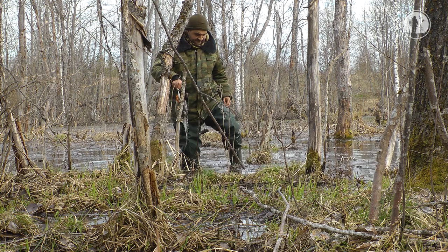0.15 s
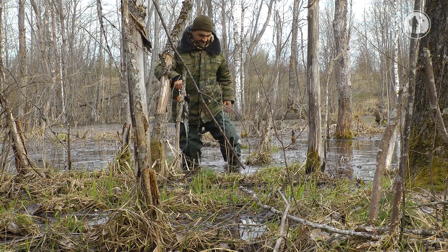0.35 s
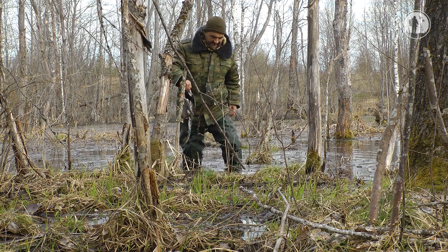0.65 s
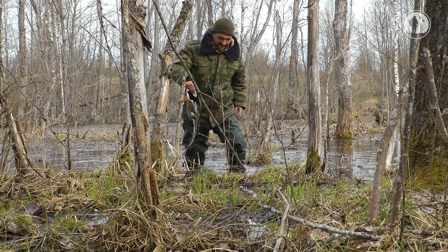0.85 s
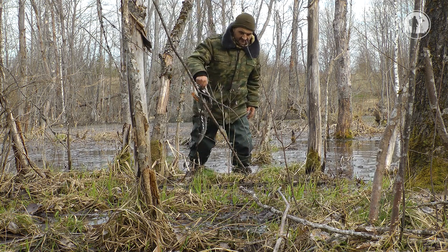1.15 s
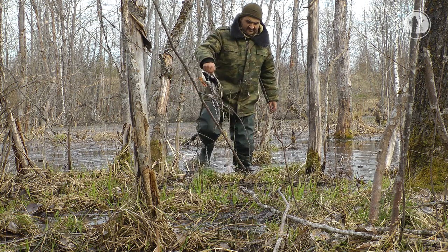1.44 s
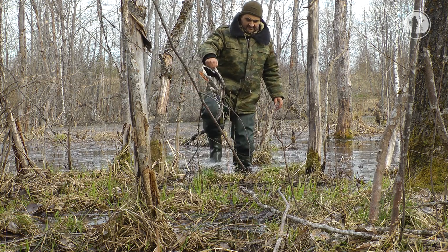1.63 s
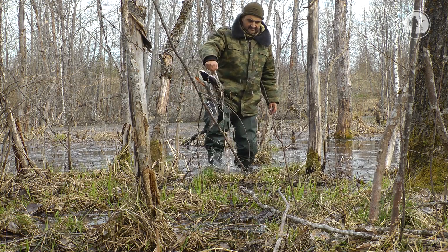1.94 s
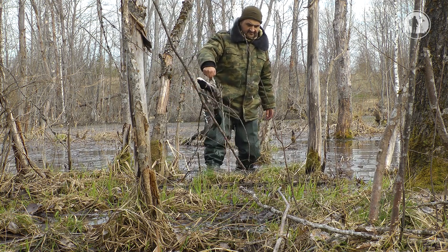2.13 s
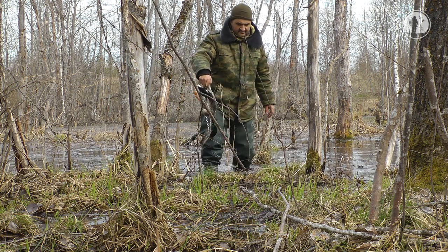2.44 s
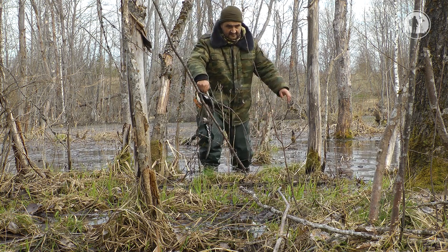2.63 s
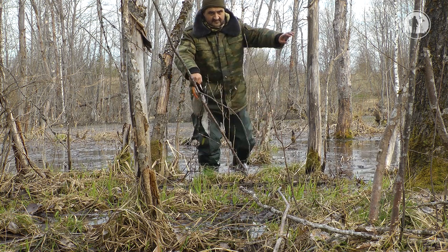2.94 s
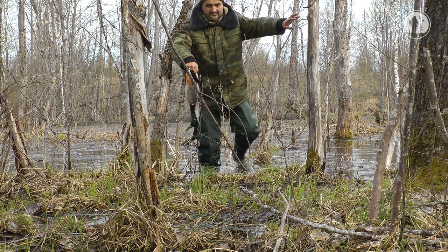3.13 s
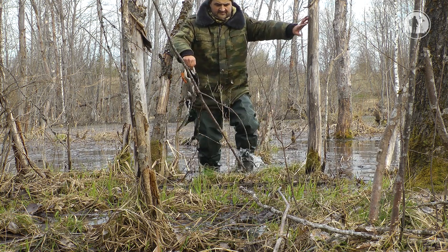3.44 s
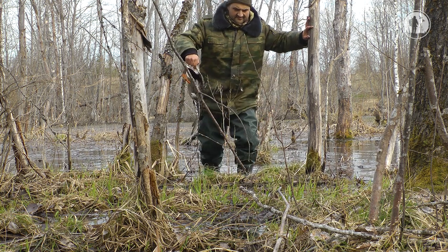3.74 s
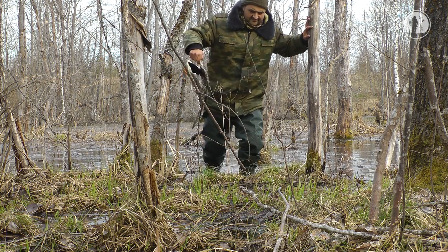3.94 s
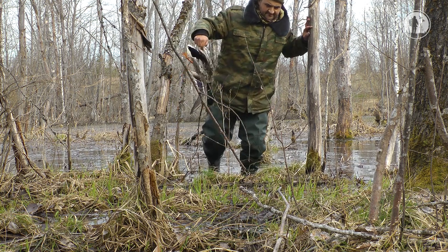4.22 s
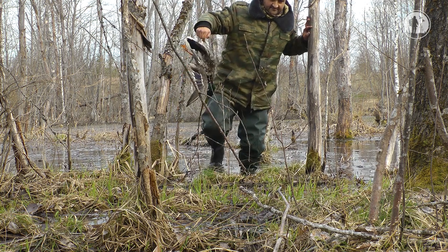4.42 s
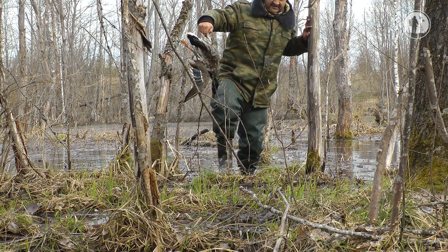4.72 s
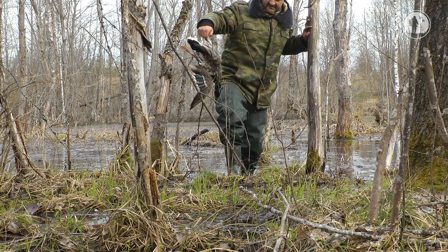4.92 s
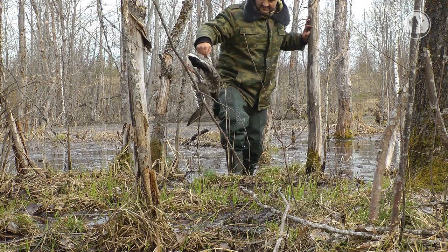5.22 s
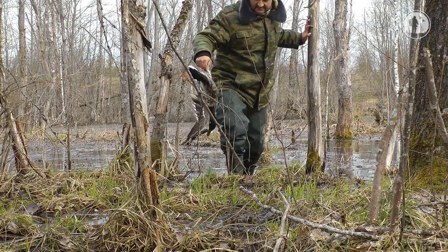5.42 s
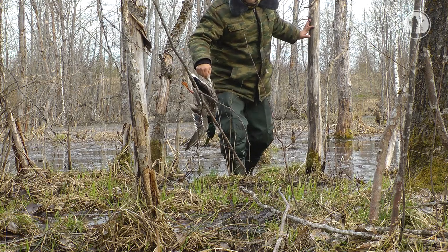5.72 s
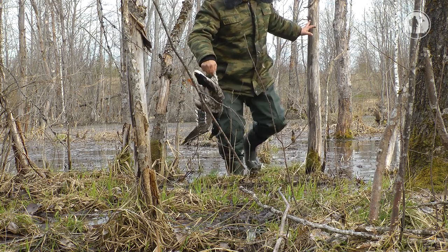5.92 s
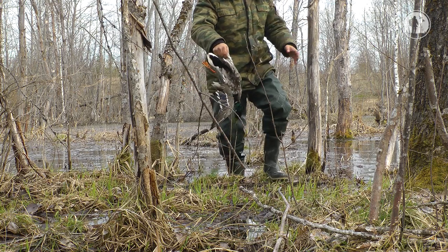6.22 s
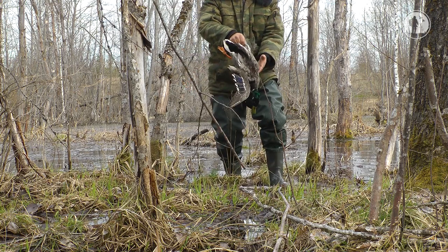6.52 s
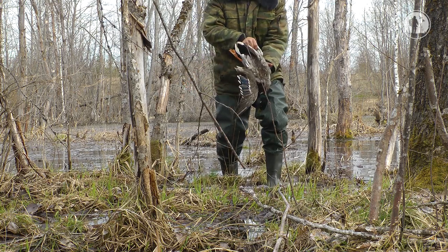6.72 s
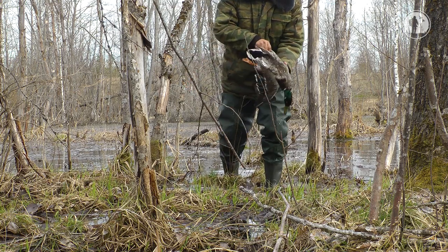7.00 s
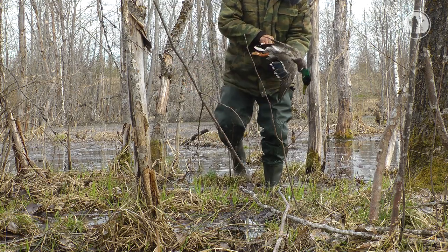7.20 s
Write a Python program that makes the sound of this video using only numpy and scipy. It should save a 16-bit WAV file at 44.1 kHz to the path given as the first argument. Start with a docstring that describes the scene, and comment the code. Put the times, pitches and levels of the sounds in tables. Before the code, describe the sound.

Rubber boots wade through shallow floodwater with splashes, gulps and slaps about every second and a half, while birds whistle over a hushed wood.

```python
"""A man in rubber boots wades through shallow floodwater in a spring wood, under a steady hush of air.
His first strides splash with bubbles and spray; far birds whistle and twigs snap. Then gulps begin, a near bird
sings, gusts touch the microphone, a boot thuds in the water, and the heaviest slaps follow. Near the end he treads
on wet sod with more thuds and snaps, and still splashes. Water sounds are swarms and single rising bubble tones,
resonant bursts and shaped spray; birds are gliding sines, air and wind coloured noise, thuds sums of fading tones."""
import sys
import numpy as np
from scipy import signal
from scipy.fft import rfft, irfft, next_fast_len
from scipy.io import wavfile
from scipy.ndimage import uniform_filter1d, map_coordinates

SR = 44100
rng = np.random.default_rng(int(sys.argv[2]) if len(sys.argv) > 2 else 0)


def master_out(mix):
    """Clip the mix to full scale and print it as 16-bit PCM to the path in sys.argv[1]."""
    frames = np.transpose(np.atleast_2d(mix))
    ceiling = np.clip(frames, -1, 1)
    pcm = np.round(ceiling * 32767).astype(np.int16)
    wavfile.write(sys.argv[1], SR, pcm)


N = 324481  # length in samples
CONTROL_S = .001  # time step of the level curves, seconds
# All levels in the tables are relative: some functions add a trim in dB.


def amp(db):
    """Turn decibels into gain."""
    return 10 ** (np.asarray(db) / 20)


def unit(x):
    """Scale to an rms of 1."""
    return x / np.sqrt(np.mean(x ** 2) + 1e-20)


def along(points, hz):
    """Read a curve of (Hz, value) points on a log frequency axis."""
    point_hz, value = np.transpose(points)
    return np.interp(np.log(hz + 1), np.log(point_hz + 1), value)


def clock(length):
    """Sample times over a length in seconds."""
    return np.arange(max(int(length * SR), 2)) / SR


def add(track, s, x):
    """Mix x into the track at s seconds."""
    part = track[max(round(s * SR), 0):][:len(x)]
    part += x[:len(part)]


def wobble(rate):
    """A smooth random curve with `rate` random points a second."""
    points = rng.standard_normal(int(N * rate / SR) + 4)
    return map_coordinates(points, [np.arange(N) * rate / SR])


def filtered(x, response):
    """Multiply the spectrum of x by a response of frequency."""
    size = next_fast_len(N + SR // 2)
    spectrum = rfft(x, size) * response(np.fft.rfftfreq(size, 1 / SR))
    return irfft(spectrum, size)[..., :N]


def coloured(x, spectrum, size=4096):
    """Colour x by (Hz, dB) points with a filter that never acts ahead of time; the result has rms 1."""
    cepstrum = irfft(np.log(amp(along(spectrum, np.fft.rfftfreq(size, 1 / SR)))))
    # folding the cepstrum makes the filter minimum phase
    cepstrum[1:size // 2] *= 2
    cepstrum[size // 2 + 1:] = 0
    impulse = irfft(np.exp(rfft(cepstrum)))
    return unit(signal.fftconvolve(x, impulse)[:N])


def stroke(s, length, db, rise, fall, growth_db=0):
    """Level in dB of one movement: it rises and falls in dB per second, and grows while it is held."""
    t = np.arange(0, N / SR, CONTROL_S) - s
    held = growth_db * (np.clip(t / length, 0, 1) - .5)
    before, after = np.maximum(-t, 0), np.maximum(t - length, 0)
    return db + held - rise * before - fall * after


def together(strokes, rest_db):
    """Level in dB, per sample, of overlapping movements: their powers add over a resting level."""
    power = np.sum(amp(strokes) ** 2, axis=0) + amp(rest_db) ** 2
    return np.interp(np.arange(N) / SR, np.arange(len(power)) * CONTROL_S, 10 * np.log10(power))


def bubbles(low_hz, high_hz, cycles, scatter_db, rise, even, count):
    """A swarm of fading, rising bubble tones of uneven strength, evened out over spans of `even` seconds."""
    when, pitch, size, life = rng.random((count, 4)).T
    hz = low_hz * (high_hz / low_hz) ** pitch
    length = np.maximum(cycles * (.5 + life) * SR / hz, 2).astype(int)
    # all bubbles laid end to end: which bubble each sample belongs to, and its step inside it
    which = np.repeat(np.arange(count), length)
    step = np.arange(len(which)) - np.repeat(np.cumsum(length) - length, length)
    age = step / length[which]
    strength = hz * amp(-scatter_db * np.log(1 - size))
    fade = strength[which] * np.exp(-np.log(100) * age)
    tones = fade * np.sin(2 * np.pi * hz[which] * step / SR * (1 + rise * age / 2))
    swarm = unit(np.bincount((when * N).astype(int)[which] + step, tones, N)[:N])
    span = max(int(even * SR), 2)
    power = uniform_filter1d(uniform_filter1d(swarm ** 2, span), span)
    return unit(swarm / np.sqrt(np.abs(power) + 1e-4))


def burst(hz, ring_t60, tail_t60, tail_db):
    """One short resonant pop with a noisy tail, of peak 1; each t60 is the seconds to fade by 60 dB."""
    t = clock(.08)
    pop = np.sin(2 * np.pi * hz * t) * amp(-60 * t / ring_t60)
    tail = amp(tail_db - 60 * t / tail_t60) * rng.standard_normal(len(t))
    x = (pop + tail) * (1 - np.exp(-t * hz))
    return x / np.abs(x).max()


def air_pockets(pockets):
    """Each air pocket starts with a plop, rises in pitch as it nears the surface and dies."""
    out, unrest = np.zeros(N), wobble(200)
    for s, hz, rise, length, db in pockets:
        t = clock(length)
        age = t / length
        pitch = hz * 2 ** (rise * age) * (1 + 0.094 * unrest[int(s * SR):][:len(t)])
        shape = (1 - np.exp(-t * hz)) * (1 - age) ** 1.67
        add(out, s, amp(db) * shape * np.sin(2 * np.pi * np.cumsum(pitch) / SR))
    return out


def bird(notes, flutter_db):
    """Whistled notes, each arching through three pitches; a fast quaver makes some of them buzz."""
    out, tremble, flutter = np.zeros(N), wobble(420), amp(flutter_db * wobble(90))
    for s, length, start_hz, middle_hz, end_hz, db, quaver in notes:
        age = clock(length) / length
        here = slice(int(s * SR), int(s * SR) + len(age))
        arch = np.polyfit([0, .5, 1], [start_hz, middle_hz, end_hz], 2)
        pitch = np.polyval(arch, age) * (1 + quaver * tremble[here])
        loudness = amp(db + 2.0) * np.abs(np.sin(np.pi * age)) ** .5 * flutter[here]
        add(out, s, loudness * np.sin(2 * np.pi * np.cumsum(pitch) / SR))
    return out


# Colour of the low and the high part of the hush. Each row: pitch in Hz, relative level in dB.
LOW_HUSH_COLOUR = [(25, -10), (60, -12), (140, -7.5), (220, -9), (300, -5.5), (410, -3.5), (560, -4.5),
                   (700, -15), (900, -24.5), (1100, -75), (1400, -16), (1600, -37), (3000, -36)]
HIGH_HUSH_COLOUR = [(900, -36), (1380, -18), (1550, -23), (1800, -7), (2500, 7.5), (3400, 3.5),
                    (5400, -2.5), (7000, -8.5), (8300, -11), (8900, -7), (9700, -1.5), (12500, -7.5),
                    (14500, -4), (16000, -24)]


def hush():
    """The steady hush of the wood: low and high noise that barely sway, as mid and side."""
    low = np.array([coloured(rng.standard_normal(N), LOW_HUSH_COLOUR) for _ in range(2)])
    high = np.array([coloured(rng.standard_normal(N), HIGH_HUSH_COLOUR) for _ in range(2)])
    return amp(-62.5 + 0.31 * wobble(3.0)) * low + amp(-61.5 + 0.07 * wobble(4.0)) * high


# Puffs of wind on the microphone. Each row: start in seconds, length in seconds, level in dB.
GUSTS = [(1.928, 0.031, -56), (2.268, 0.057, -45), (2.4, 0.05, -50), (2.522, 0.059, -52.5),
         (2.707, 0.026, -56), (3.887, 0.035, -52), (4.0, .15, -65), (4.67, .03, -61), (4.83, 0.024, -56)]
# Colour of the wind's rumble. Each row: pitch in Hz, relative level in dB.
WIND_COLOUR = [(15, -3.5), (40, 6.5), (70, 8), (120, -6), (250, -38), (800, -106)]
BREEZE_DB, GUST_RISE_DB_PER_S, GUST_FALL_DB_PER_S = -73.5, 350, 165  # the breeze stays between gusts


def wind():
    """Light wind on the microphone: deep noise that swells with each gust, as mid and side."""
    gusts = [stroke(s, length, db, GUST_RISE_DB_PER_S, GUST_FALL_DB_PER_S) for s, length, db in GUSTS]
    level_db = together(gusts, BREEZE_DB)
    rumble = np.array([coloured(rng.standard_normal(N), WIND_COLOUR) for _ in range(2)])
    return amp(level_db - 6.5 + 3.3 * wobble(12)) * rumble


# How wide the air sounds. Each row: pitch in Hz, gain of the side signal in dB.
AIR_WIDTH = [(60, -3.5), (200, 1.5), (380, -10.5), (1300, -1), (2400, -16), (4400, -35), (8000, -2),
             (15000, -104)]


def air():
    """Hush and wind together, with the side signal's gain set pitch by pitch."""
    mid, side = hush() + wind()
    return np.array([mid, filtered(side, lambda hz: amp(along(AIR_WIDTH, hz)))])


# How long the trunks answer. Each row: pitch in Hz, seconds to fade by 60 dB.
TRUNK_FADE = [(150, 0.35), (1000, 0.29), (3000, 0.54), (6000, 0.49), (14000, 0.031)]


def wood(x):
    """Scattered answer of the trunks: noise tails that fade at their own speed per pitch, as mid and side."""
    hz, t, noise = signal.stft(rng.standard_normal((2, SR)), SR, nperseg=256)
    fade = amp(-60 * t / along(TRUNK_FADE, hz)[:, None])
    tail = signal.istft(noise * fade, SR, nperseg=256)[1]
    return signal.fftconvolve(x[None], tail / np.linalg.norm(tail[0]), axes=1)[:, :N]


def echoes(x, first, last, count):
    """Weak copies thrown back by the water surface and nearby trunks, together as strong as x."""
    out = np.zeros(N)
    for delay in first + (last - first) * (np.arange(count) + rng.random(count)) / count:
        add(out, delay, x * rng.choice([-1, 1]) / np.sqrt(count))
    return out


# Whistles from deep in the wood. Each row: start in seconds, length in seconds, start, middle and end
# pitch in Hz, level in dB, strength of the quaver as a share of the pitch.
FAR_SONG = [(.29, 0.25, 2860, 2790, 2590, -73, 0.058), (.77, 0.036, 4950, 4970, 4950, -71.5, 0.0046),
            (.94, 0.037, 3720, 3790, 3600, -75, .005), (1.29, 0.16, 3350, 3330, 3380, -68, 0.046),
            (1.76, 0.45, 7840, 8640, 8300, -67.5, 0.017), (3.87, 0.45, 3090, 2875, 2760, -65, 0.0366),
            (5.23, 0.21, 1850, 2163, 2340, -67, .035), (5.49, 0.12, 2183, 2490, 2450, -57, 0.0655),
            (5.88, 0.16, 3120, 3510, 3740, -64.5, 0.035), (6.28, 0.19, 3140, 3124, 3130, -59.5, 0.012),
            (6.63, 0.075, 2024, 2410, 2615, -56, 0.051), (6.805, 0.0474, 3260, 2937, 2880, -60, 0.017),
            (6.99, 0.036, 2300, 2156, 2070, -67, .03)]


def far_birds():
    """Far whistles: gliding tones with a strongly fluttering loudness."""
    return bird(FAR_SONG, flutter_db=5)


# A near songbird's notes. Each row: start in seconds, length in seconds, start, middle and end
# pitch in Hz, level in dB, strength of the quaver as a share of the pitch.
NEAR_SONG = [(1.215, .08, 4500, 5500, 6200, -60, .012), (1.21, .07, 8700, 10100, 11900, -63, .007),
             (1.315, .042, 7300, 7600, 6900, -64, .01), (1.322, .038, 9200, 9700, 11000, -61, .03),
             (1.445, .062, 7840, 7230, 5700, -59, .022), (2.208, .062, 3100, 3420, 3820, -45.5, .038),
             (2.283, .045, 3924, 4050, 3960, -47, .035), (2.325, .08, 3930, 4150, 4100, -44, .025),
             (2.491, .022, 4650, 4030, 4200, -44, .008), (2.515, .046, 4300, 4560, 4480, -46, .035),
             (2.67, .084, 8400, 7740, 7560, -58, .015), (2.775, .089, 8700, 8000, 9030, -59, .015),
             (2.955, .026, 8300, 7500, 7700, -58.5, .01), (3.053, .011, 5400, 4700, 4000, -45, .005),
             (3.066, .028, 4850, 4650, 3650, -46, .005), (3.122, .056, 4200, 5250, 4000, -46, .007),
             (3.176, .016, 4100, 4500, 5100, -47, .005), (3.203, .032, 5150, 4750, 3650, -44, .005),
             (3.29, .035, 4100, 5450, 5400, -41, .006), (3.32, .026, 6000, 5950, 5500, -46, .005),
             (3.438, .046, 4100, 5120, 5200, -41.5, .005), (3.472, .036, 6150, 5900, 5350, -44.5, .005),
             (3.58, .022, 4100, 4830, 5200, -49, .006), (3.806, .02, 4600, 5300, 5600, -49, .02),
             (3.885, .038, 3600, 4230, 3700, -50, .12), (3.975, .022, 5300, 4200, 4100, -50, .02),
             (4.055, .014, 5750, 4600, 3500, -50, .008)]


def near_bird():
    """Near song: short gliding tones with a gently fluttering loudness."""
    return bird(NEAR_SONG, flutter_db=2.0)


# Twigs and dry stalks breaking. Each row: start in seconds, level in dB, pitch in Hz.
SNAPS = [(0.622, -38.5, 5400), (0.9973, -26.5, 5000), (5.096, -39.5, 13600), (5.148, -41.5, 13100),
         (6.1982, -24.5, 4220), (6.492, -31.5, 5870), (6.682, -44.5, 4470)]


def snaps():
    """Twigs crack under the boots: a ten-cycle pop with a faint noisy tail."""
    out = np.zeros(N)
    for s, db, hz in SNAPS:
        add(out, s, amp(db + 4) * burst(hz, ring_t60=10 / hz, tail_t60=0.053, tail_db=-25.5))
    return out


# Boot thuds, in the water and on the sod. Each row: start in seconds, level in dB.
THUDS = [(2.023, -37.5), (6.388, -27.5), (6.409, -35), (6.431, -54), (6.92, -41.5)]
# Tones of a thud, varied a little each time. Each row: pitch in Hz, level in dB, seconds to fade by 60 dB.
THUD_TONES = [(94, -10, 0.117), (115, -9.5, 0.15), (155.6, 4, 0.052), (298, -4.5, 0.11), (420, 6, 0.046),
              (561, 3, 0.042), (740, 1, 0.065)]


def thuds():
    """The boot comes down with a dull thud of several fading tones."""
    out, t = np.zeros(N), clock(.2)
    for s, db in THUDS:
        ring = np.zeros(len(t))
        for hz, level, t60 in THUD_TONES:
            fade = amp(level + rng.normal(0, 1) - 60 * t / t60)
            ring += fade * np.cos(2 * np.pi * hz * rng.normal(1, 0.037) * t)
        soft_start = 1 - np.exp(-t / 0.0048)
        add(out, s, amp(db - 6.5) * ring * soft_start)
    # the thuds hold little deep bass
    return signal.sosfilt(signal.butter(3, 80, "high", fs=SR, output="sos"), out)


# Drops falling back into the pool. Each row: start in seconds, pitch in Hz, level in dB.
DRIPS = [(.265, 2750, -39), (.283, 2710, -42), (0.297, 1960, -43.5), (.32, 2650, -45), (.37, 1850, -47.5),
         (0.422, 2790, -46), (0.568, 1390, -51.5), (1.552, 1840, -37), (2.443, 2110, -48),
         (6.12, 1804, -41)]
DRIP_CYCLES, DRIP_RISE = 42, .1  # length in cycles of the table's pitch, rise in octaves


def drips():
    """Each drop rings as one small air pocket."""
    return air_pockets([(s, hz, DRIP_RISE, DRIP_CYCLES / hz, db) for s, hz, db in DRIPS])


# Single air pockets closing. Each row: start in seconds, pitch in Hz, rise in octaves,
# length in seconds, level in dB.
GULPS = [(1.322, 474, 0.39, 0.016, -35), (1.639, 429, 0.13, 0.052, -40.5), (1.679, 424, 0.13, 0.041, -38),
         (1.853, 415, 0.16, 0.02, -39), (2.0212, 435, 0.57, 0.0066, -26), (2.186, 547, 0.39, 0.035, -38),
         (3.038, 652, 0.89, .052, -40), (3.091, 760, .08, 0.039, -40.5), (3.246, 376, 0.19, 0.026, -28),
         (3.378, 487, 0.21, 0.057, -38), (3.502, 133, .1, 0.036, -32.5), (3.51, 453.3, .58, 0.094, -35),
         (3.615, 238, 0.95, 0.054, -35), (3.811, 440, 0.58, 0.028, -42), (3.964, 457, 0.18, 0.024, -42),
         (4.339, 617, 0.98, 0.026, -48.5), (4.503, 422, 0.29, 0.04, -39), (4.634, 565, 0.11, .04, -35),
         (4.675, 469, 0.13, 0.092, -43), (5.904, 780, 0.4, 0.029, -41), (6.139, 720, .08, 0.025, -45)]


def gulps():
    """Gulping bubbles: single air pockets that rise in pitch."""
    return air_pockets(GULPS)


# A leg pushes water aside under the surface. Each row: start in seconds, length in seconds,
# slosh level in dB, deep churn level in dB.
PUSHES = [(0.0, 0.036, -48, -57), (0.139, 0.038, -50.5, -72), (1.126, 0.21, -59.5, -63),
          (1.492, 0.12, -47, -70), (1.663, 0.19, -44.5, -66.5), (2.038, 0.3, -61.5, -70.5),
          (3.076, 0.17, -55.5, -69), (3.246, 0.047, -39.5, -56), (3.307, 0.35, -42.5, -55.5),
          (3.806, 0.012, -52.5, -70), (4.356, 0.33, -57.5, -76), (4.547, 0.18, -51, -72),
          (4.754, .22, -56, -85), (5.917, 0.14, -53.5, -68), (6.097, 0.3, -65.5, -76),
          (6.379, 0.043, -59, -55.5), (6.91, 0.015, -60, -68), (7.225, 0.16, -52, -63)]
# Colour of the slosh and of the deep churn. Each row: pitch in Hz, gain in dB.
SLOSH_COLOUR = [(150, -24.5), (300, -7), (420, 1), (550, 1), (630, -6), (720, 1), (850, -12), (1030, -9),
                (1200, -15.5), (1370, -3.5), (1550, -21.5), (2200, -16.5)]
CHURN_COLOUR = [(50, -21), (110, 0.5), (200, 0.5), (300, -1), (450, 5), (900, -62)]
PUSH_RISE_DB_PER_S, PUSH_FALL_DB_PER_S = 800, 220
LAP_DB, SWAY_DB = -76.5, -77.5  # slosh and churn left between the pushes


def push_level(pushes, rest_db):
    """Level in dB of all the leg's pushes over what is left between them."""
    strokes = [stroke(s, length, db, PUSH_RISE_DB_PER_S, PUSH_FALL_DB_PER_S) for s, length, db in pushes]
    return together(strokes, rest_db)


def slosh():
    """The boot shaft drags air under, where it rings as large bubbles."""
    slosh_db = push_level([(s, length, db) for s, length, db, _ in PUSHES], LAP_DB)
    churn_db = push_level([(s, length, db) for s, length, _, db in PUSHES], SWAY_DB)
    swirl = bubbles(288.8, 1675, cycles=15.9, scatter_db=4.0, rise=0.344, even=0.03, count=2600)
    churn = bubbles(81.0, 378, cycles=6.2, scatter_db=6.5, rise=0.45, even=0.072, count=900)
    return amp(slosh_db - 2.5) * coloured(swirl, SLOSH_COLOUR) + amp(churn_db + 1.5) * coloured(churn, CHURN_COLOUR)


# Water slapping back on the surface and on the rubber. Each row: start in seconds (played 0.6 ms later),
# level in dB, pitch in Hz.
SLAPS = [(.0074, -25, 2070), (0.195, -30, 2930), (1.5886, -21.5, 2670), (1.623, -29, 2700),
         (1.662, -24, 2680), (2.0264, -29, 2290), (2.052, -25, 2200), (2.087, -31, 2650),
         (2.12, -22.5, 2100), (2.246, -28, 1880), (3.266, -29, 2230), (3.3877, -23.5, 2200),
         (3.642, -19, 1700), (3.663, -20, 1730), (4.341, -47, 2250), (4.6238, -19.5, 2220),
         (4.6497, -22, 2650), (4.8894, -20, 2000), (4.962, -18, 2130), (4.9766, -21, 2590),
         (5.0124, -25, 2130), (6.0145, -24.5, 2030), (6.298, -36, 2140), (6.4846, -25, 2140),
         (6.5058, -25, 2500), (6.519, -27, 2970), (6.566, -32, 2970), (6.6033, -31.5, 3120),
         (6.921, -29, 2005), (7.3246, -32, 1790)]


def slaps():
    """Lumps of water land with a dull smack: a ringing pop in strong noise, then coloured."""
    out = np.zeros(N)
    for s, db, hz in SLAPS:
        add(out, s + .0006, amp(db) * burst(hz, ring_t60=.022, tail_t60=.04, tail_db=0))
    # each pair: pitch in Hz, gain in dB
    smack = [(300, -19), (1000, -17.0), (1800, 0.5), (2900, 0.5),
             (3800, -6), (5500, -3.5), (7500, -46), (15000, -28.0)]
    return filtered(out, lambda hz: amp(along(smack, hz)))


LEAD_S, LEAD_DB, LEAD_SPRAY_DB = 0.15, -4.5, -9  # the shin stirs the surface before the boot breaks out
RISE_DB_PER_S, FALL_DB_PER_S = 696, 376  # how fast thrown water builds up and comes down
RUNOFF_DB, RUNOFF_DB_PER_S = -5.5, 73  # water keeps running off the boot after each stride
SHEET_S, SHEET_FALL_DB_PER_S = 0.0086, 319  # a sheet lands almost at once and dies fast


def thrown(strides, sheets, brushes, lead_db, rest_db):
    """Level of airborne water: strides stir, break out and run off; sheets land at once; grass is brushed."""
    parts = [stroke(s, SHEET_S, db, rise=1700, fall=SHEET_FALL_DB_PER_S) for s, db in sheets]
    parts += [stroke(s, length, db, rise=520, fall=190) for s, length, db in brushes]
    for s, length, db, growth_db in strides:
        parts += [stroke(s - LEAD_S, LEAD_S, db + lead_db, RISE_DB_PER_S, FALL_DB_PER_S),
                  stroke(s, length, db, RISE_DB_PER_S, FALL_DB_PER_S, growth_db),
                  stroke(s, length, db + RUNOFF_DB, RISE_DB_PER_S, RUNOFF_DB_PER_S)]
    return together(parts, rest_db)


# A boot swings through the water. Each row: start in seconds, length in seconds, splash level in dB,
# fine spray level in dB, growth over the stride in dB.
STRIDES = [(0.0, 0.17, -54.5, -59.5, 7), (1.588, 0.3, -45.5, -55, -4), (2.018, 0.2, -51, -57, -1),
           (3.261, 0.48, -46, -53.5, 10.5), (4.603, 0.31, -46, -55, 5), (6.176, 0.35, -53.5, -56, -0.5),
           (7.257, .09, -58, -54.5, 6)]
# Single sheets of water flung off a boot. Each row: start in seconds, splash level in dB,
# fine spray level in dB.
SHEETS = [(0.003, -42, -52), (0.196, -45.5, -47.5), (2.135, -67, -52.5), (2.32, -53, -64),
          (3.269, -37, -78), (3.644, -38, -46), (4.345, -48.5, -86), (4.619, -44.5, -52), (4.884, -43, -57),
          (4.977, -44, -52), (5.846, -44, -72), (6.039, -57, -52), (6.396, -44.5, -47.5),
          (6.915, -54, -60.5), (7.186, -46.5, -62)]
# Boots and trouser legs brush through wet grass. Each row: start in seconds, length in seconds,
# splash level in dB, fine spray level in dB.
BRUSHES = [(1.135, 0.25, -63, -66.5), (2.757, 0.092, -60, -61.5), (4.344, 0.041, -57, -86),
           (5.902, 0.49, -54, -70), (6.674, 0.51, -64.5, -73.5)]
TRICKLE_DB, MIST_DB = -66.5, -80.5  # the disturbed pool never quite settles


def splash_level():
    """Level in dB of the coarse splash."""
    strides = [(s, length, db, growth) for s, length, db, _, growth in STRIDES]
    sheets = [(s, db) for s, db, _ in SHEETS]
    brushes = [(s, length, db) for s, length, db, _ in BRUSHES]
    return thrown(strides, sheets, brushes, LEAD_DB, TRICKLE_DB)


def spray_level():
    """Level in dB of the fine spray."""
    strides = [(s, length, db, growth) for s, length, _, db, growth in STRIDES]
    sheets = [(s, db) for s, _, db in SHEETS]
    brushes = [(s, length, db) for s, length, _, db in BRUSHES]
    return thrown(strides, sheets, brushes, LEAD_SPRAY_DB, MIST_DB)


# Colour of the splash and of the fine spray. Each row: pitch in Hz, gain in dB.
SPLASH_COLOUR = [(500, -33.5), (800, -2.5), (1000, -16.5), (1370, -7), (1540, -10), (1760, 2), (2650, 0.5),
                 (3050, -3), (3400, -13), (4900, -10), (7000, -16), (12000, -36)]
SPRAY_COLOUR = [(1500, -21.5), (3000, 5), (5400, 3), (7000, -4), (8400, -0.5), (10400, 2.5), (12500, -4),
                (14500, 0), (16000, -10)]


def splashes():
    """Thrown water breaks into clumps of small bubbles; a few ring on, drops tick, and fine spray patters."""
    clumps = wobble(70)  # splash and spray clump together
    small = bubbles(781, 7100, cycles=11.5, scatter_db=0.5, rise=.17, even=.01, count=11000)
    ringing = bubbles(1100, 4500, cycles=48, scatter_db=4, rise=.18, even=.08, count=700)
    ticks = bubbles(1073, 7100, cycles=11.3, scatter_db=2.0, rise=0.39, even=0.049, count=520)
    swarm = small * amp(1.4 * clumps) + amp(-5) * ringing + amp(-5.5) * ticks
    splash = amp(splash_level() - 0.5) * coloured(swarm, SPLASH_COLOUR)
    drops = bubbles(1960, 14900, cycles=5.3, scatter_db=2, rise=0.13, even=0.068, count=48000)
    patter = drops * amp(2.0 * clumps + 2.0 * wobble(200))
    spray = amp(spray_level() + 4.0) * coloured(patter, SPRAY_COLOUR)
    return splash + spray


# How wide the wader, the birds and their echoes sound. Each row: pitch in Hz, gain of the side signal in dB.
NEAR_WIDTH = [(60, -30), (200, -17), (380, -18), (1300, -13), (2400, -17), (4400, -18.5), (8000, -20.5),
              (15000, -105)]


def scene():
    """The wader and birds straight ahead, with the wood's answer and the air all round."""
    wader = splashes() + slosh() + gulps() + drips() + slaps() + snaps() + thuds()
    near, far = near_bird(), far_birds()
    song = near + amp(-15) * echoes(near, first=.017, last=0.056, count=4) + amp(1.5) * far
    mid, side = wood(amp(-10) * wader + amp(-4.0) * near + amp(1.0) * far)
    # the first reflections differ between left and right
    side = side + echoes(wader + song, first=0.00066, last=0.04, count=14)
    side = filtered(side, lambda hz: amp(along(NEAR_WIDTH, hz)))
    mid, side = np.array([mid + wader + song, side]) + air()
    # the left channel is 0.3 dB louder than the right
    return np.array([mid + side, mid - side]) * amp([[.15], [-.15]])


TOP_HZ = 15900


def record(dry):
    """Keep nothing at or above the band limit."""
    return filtered(dry, lambda hz: hz < TOP_HZ)


dry = scene()
out = record(dry)
master_out(out)
```